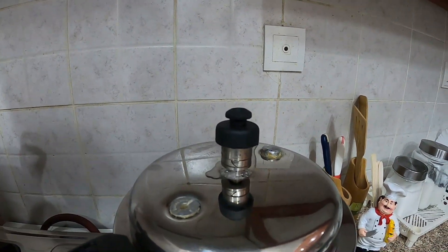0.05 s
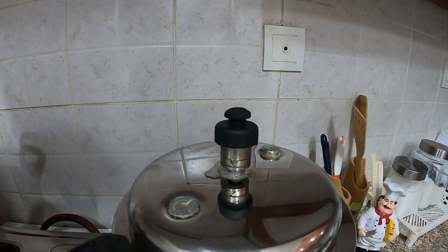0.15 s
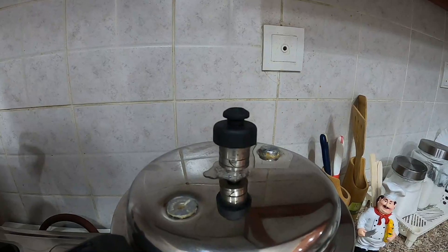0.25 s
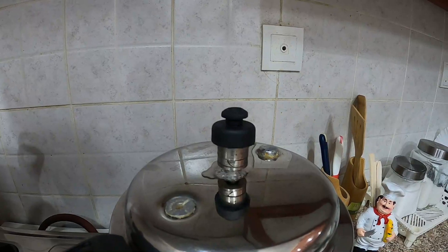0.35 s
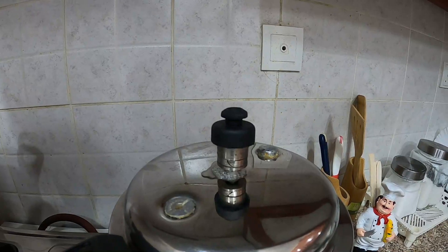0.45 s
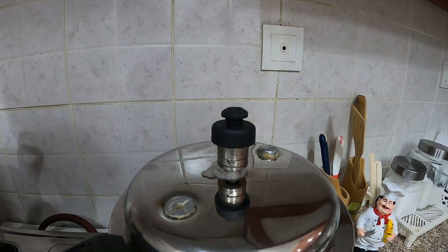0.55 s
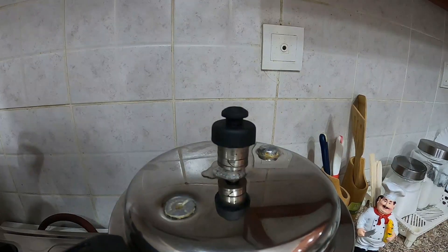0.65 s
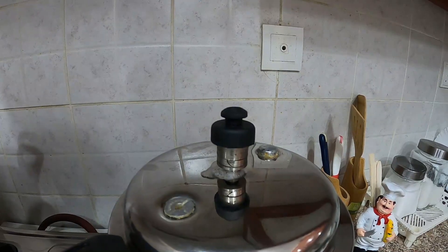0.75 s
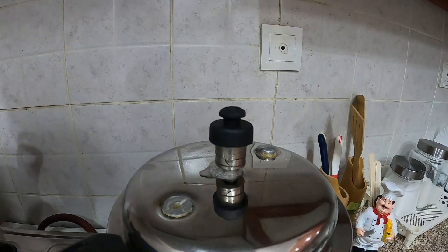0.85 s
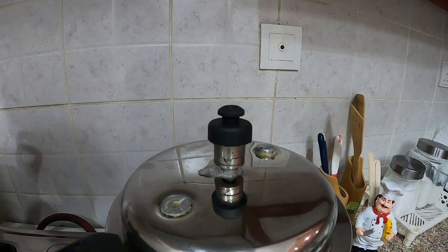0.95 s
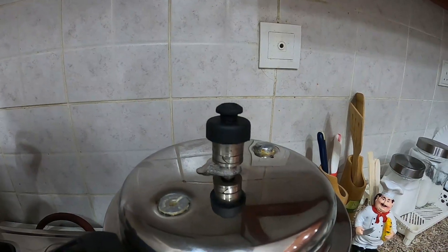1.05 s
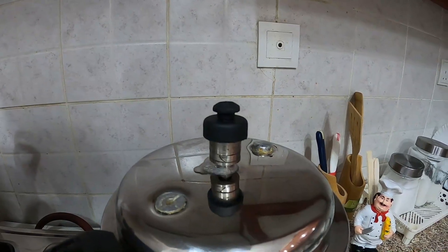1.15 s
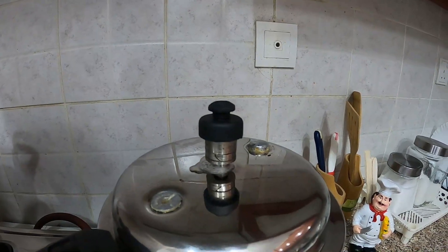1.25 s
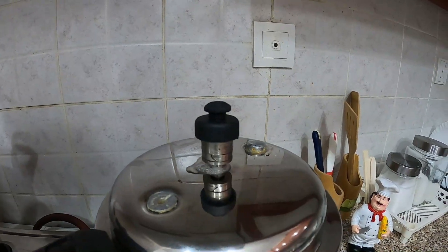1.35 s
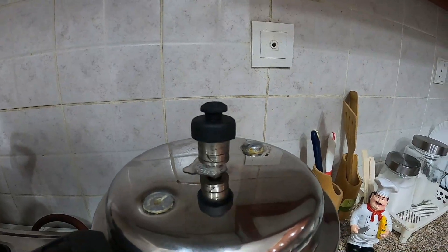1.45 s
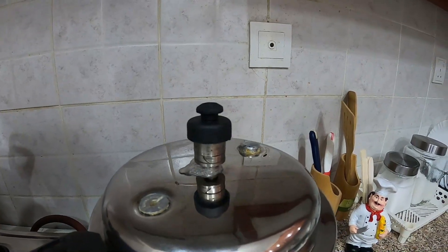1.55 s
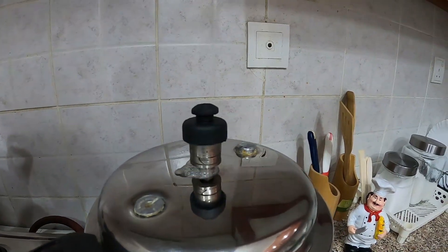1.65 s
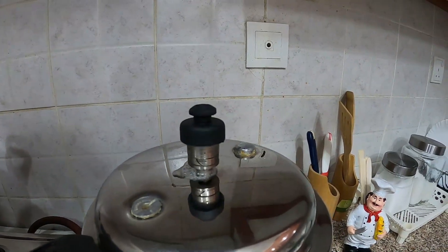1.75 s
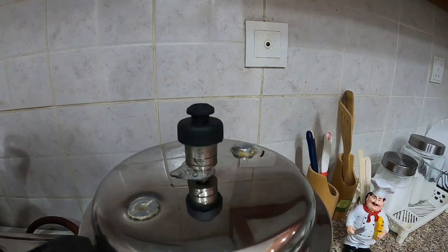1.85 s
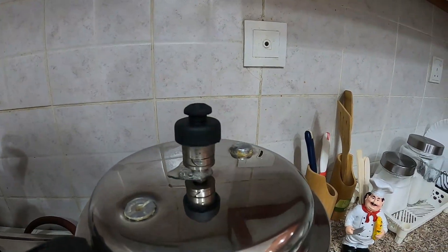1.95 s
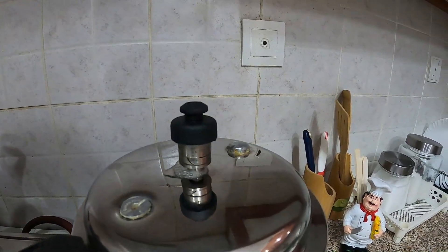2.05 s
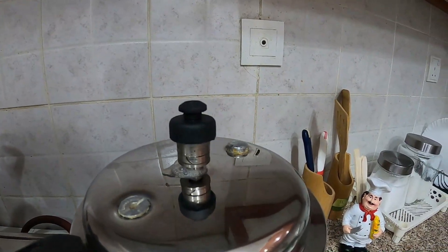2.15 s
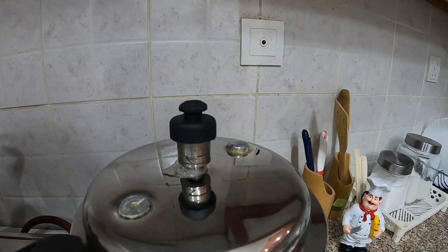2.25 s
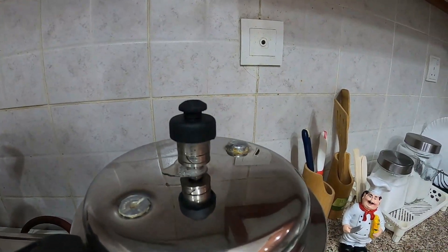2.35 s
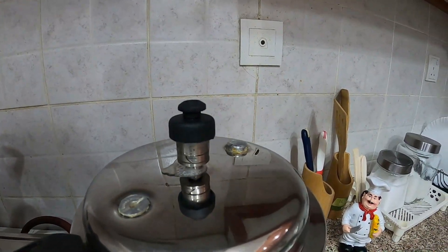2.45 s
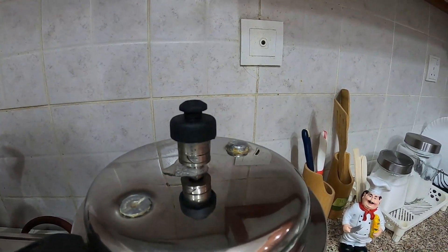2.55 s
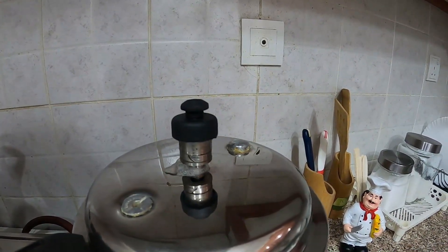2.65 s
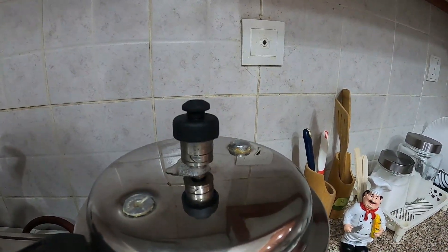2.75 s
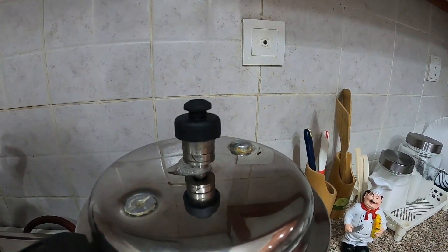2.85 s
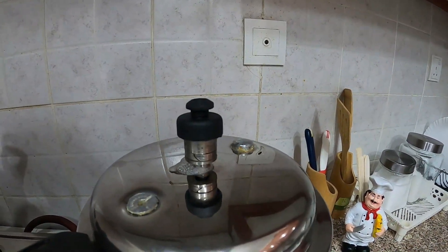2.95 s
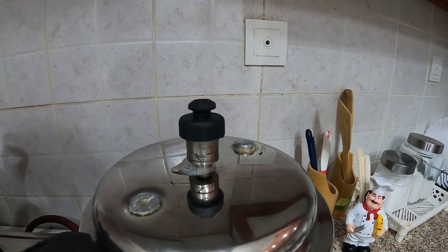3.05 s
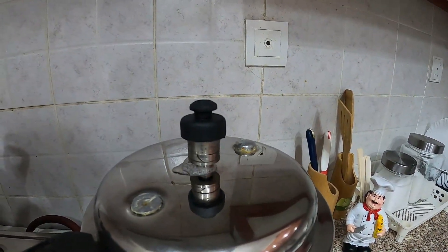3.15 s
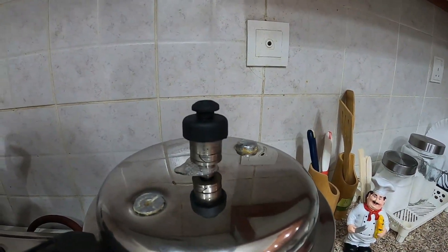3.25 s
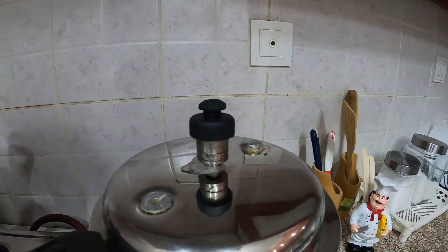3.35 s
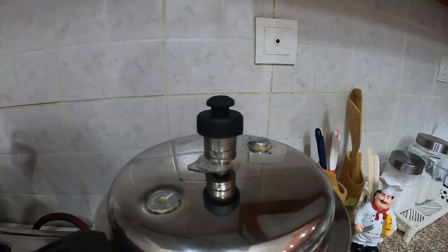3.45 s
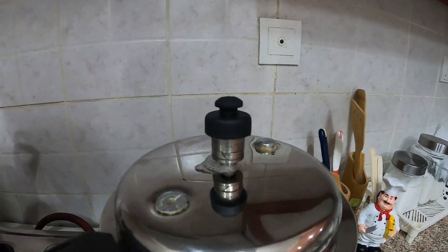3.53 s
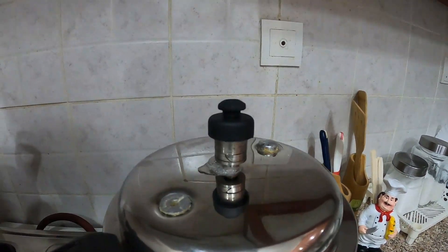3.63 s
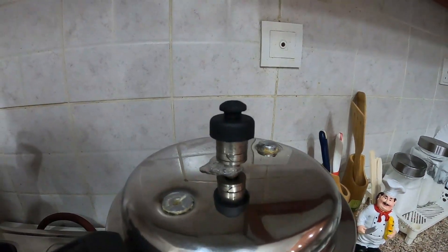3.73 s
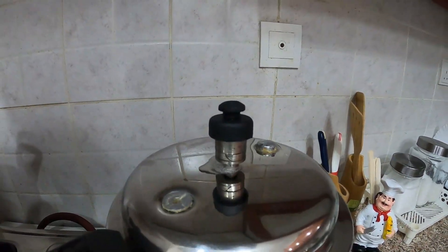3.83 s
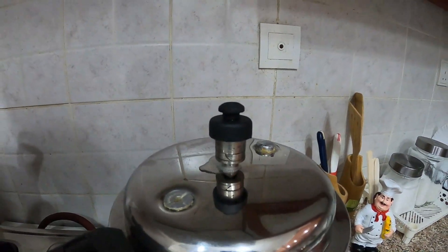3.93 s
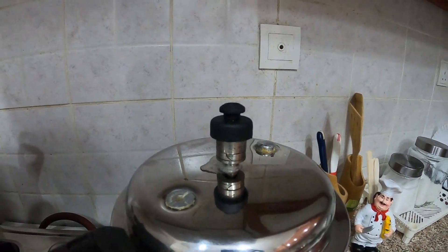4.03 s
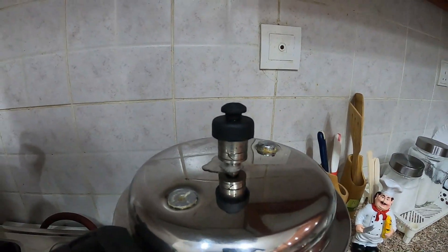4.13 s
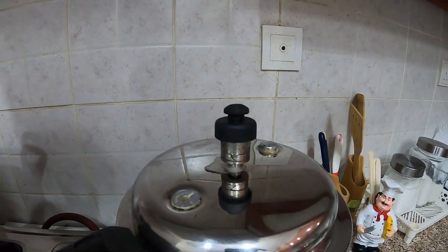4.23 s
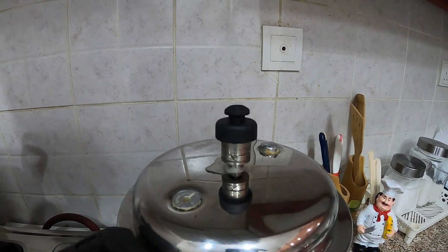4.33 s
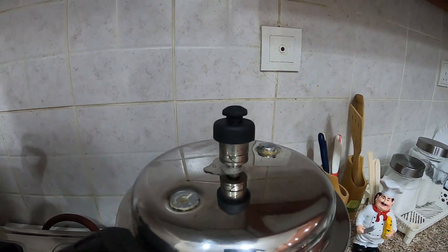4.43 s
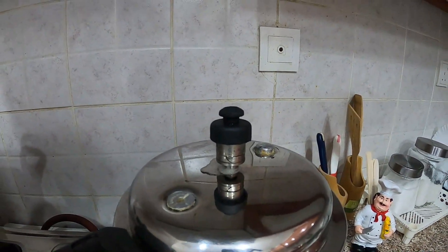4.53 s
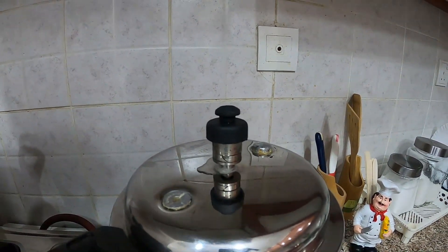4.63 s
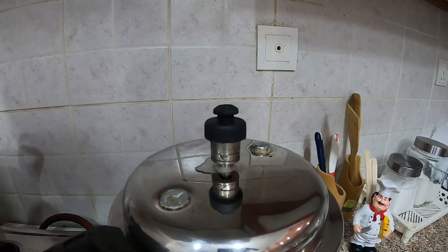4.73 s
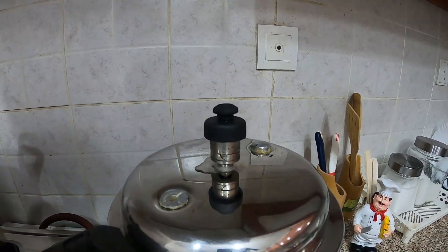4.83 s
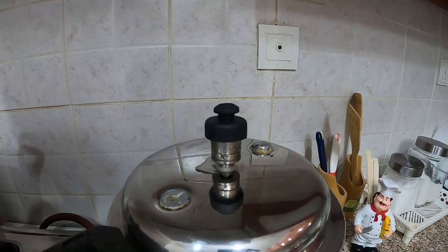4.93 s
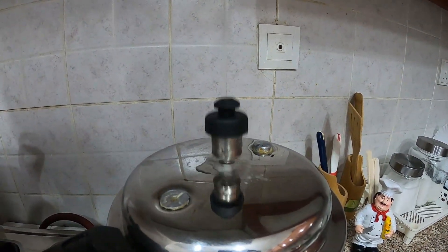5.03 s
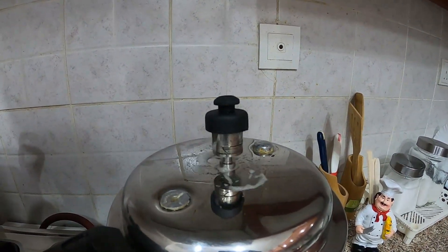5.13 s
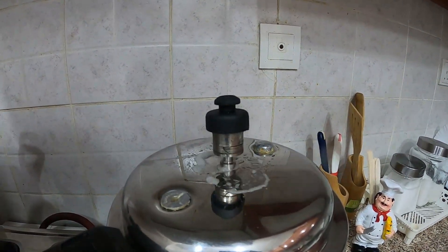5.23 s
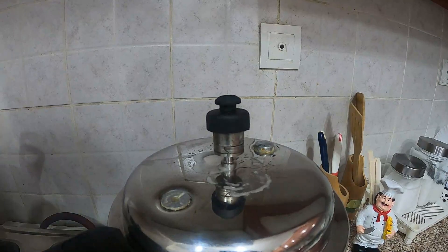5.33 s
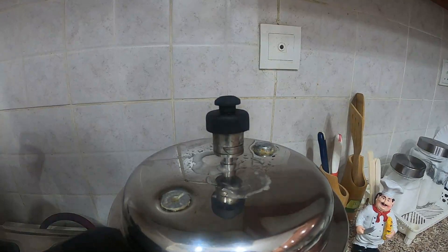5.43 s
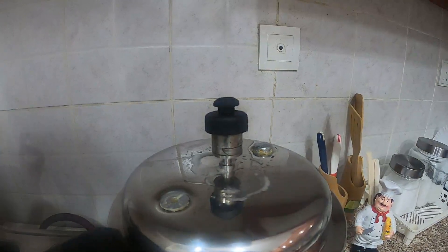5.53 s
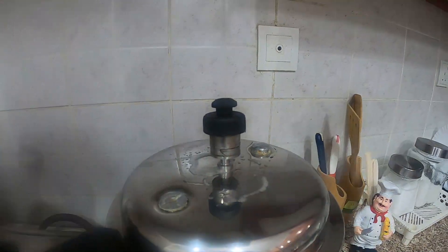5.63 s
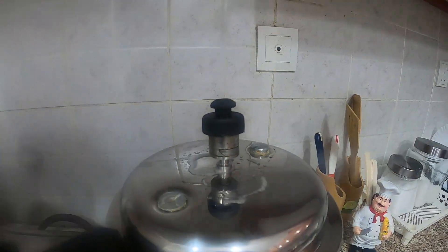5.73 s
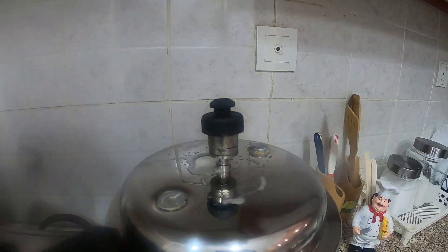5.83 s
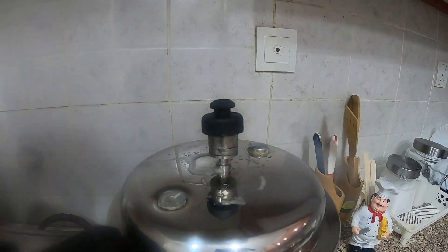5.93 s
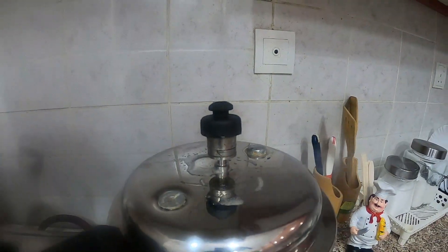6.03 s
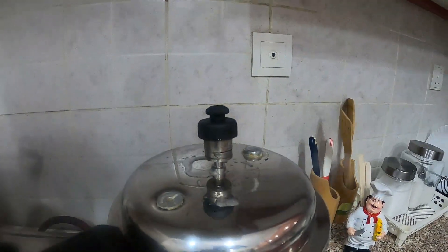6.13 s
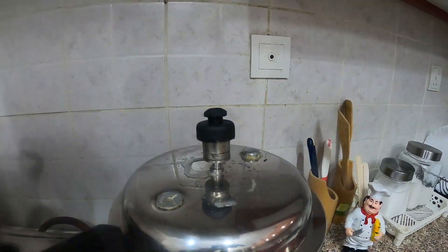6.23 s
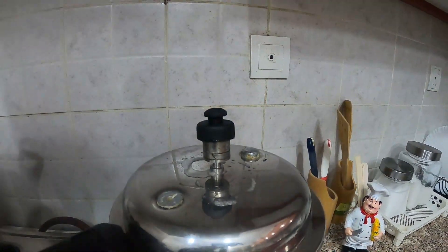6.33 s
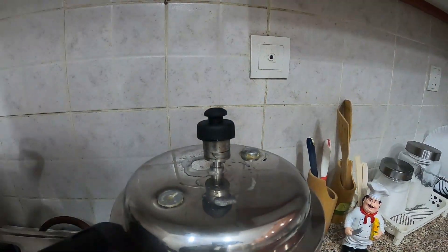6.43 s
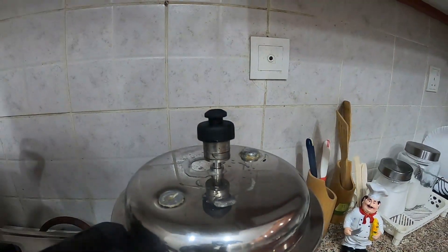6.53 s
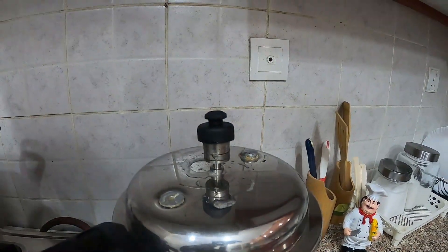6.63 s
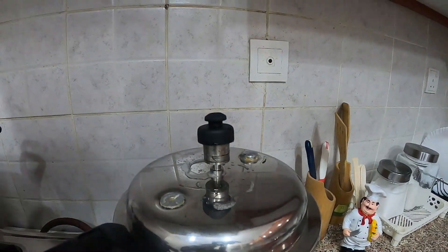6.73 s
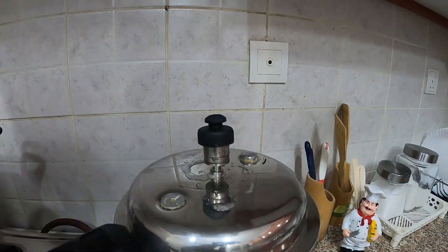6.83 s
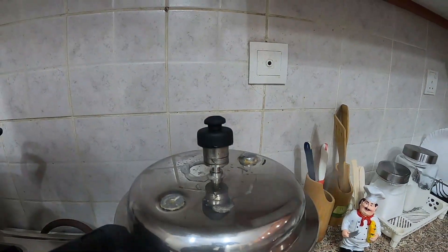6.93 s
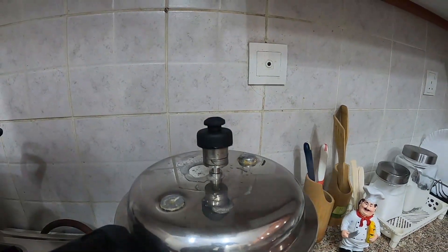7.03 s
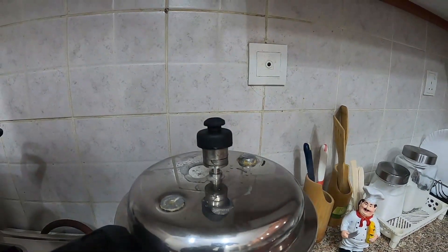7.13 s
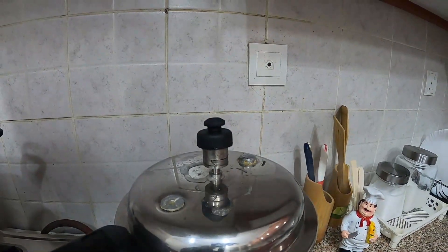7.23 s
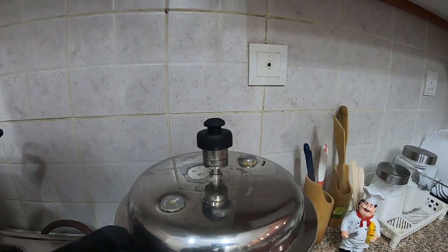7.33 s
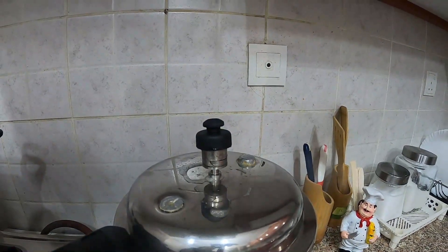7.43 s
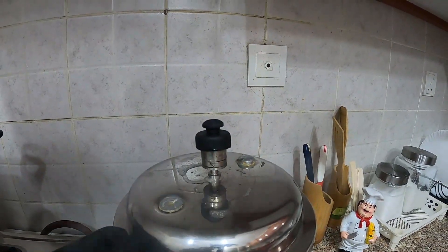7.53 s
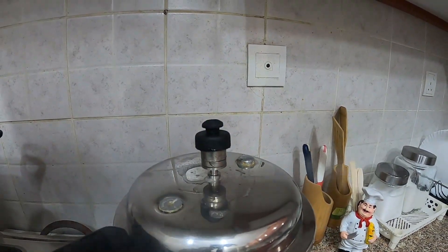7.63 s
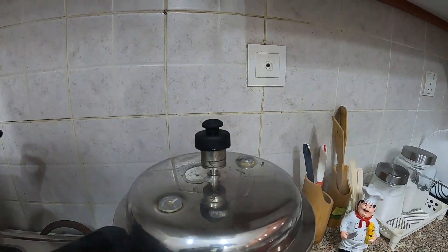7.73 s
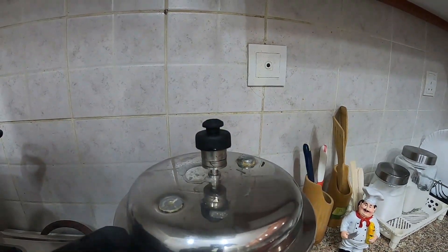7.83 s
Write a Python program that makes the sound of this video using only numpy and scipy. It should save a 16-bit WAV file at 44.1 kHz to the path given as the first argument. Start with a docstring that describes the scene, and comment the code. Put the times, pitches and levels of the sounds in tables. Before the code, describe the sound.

Faint fridge hum and fizzing simmer come first, with isolated ticking spits from a metal valve and a few dull pot knocks. Around three seconds the leaking steam becomes audible, wet and uneven, swelling in short surges. Just past five seconds it breaks open with a throaty splash and low wind thump, then settles into a strong continuous steam jet with thin whistling edges. Close stereo microphone, short hard tile reflections.

```python
"""A refrigerator hums softly and a pressure cooker simmers in a tiled kitchen, as coloured, droplet-laden noise.
Its valve spits as short ringing puffs, bubbles knock in the pot, and a wet, sputtering leak grows in surges.
The weight lifts: a slug of water gushes, spray follows, and the steam cloud buffets mainly the right port.
A loud, steady free jet remains, as noise through the resonances of the open vent, with a soft draught."""
import sys
import numpy as np
from scipy import signal
from scipy.fft import rfft, irfft
from scipy.io import wavfile

SR = 44100
rng = np.random.default_rng(int(sys.argv[2]) if len(sys.argv) > 2 else 0)


def persist_wave(psi):
    """Save psi, clipped to +-1, as 16-bit WAV."""
    counts = np.round(np.clip(psi, -1, 1) * 32767).astype(np.int16)
    wavfile.write(sys.argv[1], SR, np.atleast_2d(counts).T)


N = 347155
TIME = np.arange(N) / SR
BINS = np.fft.rfftfreq(N, 1 / SR)

# multiples of the compressor shaft speed that sound [order], and their relative levels [level_db]
SHAFT_HZ = 48.44
HUM_ORDERS = [3, 6, 9, 11, 12, 13, 19, 27, 36]
HUM_ORDERS_DB = [-2, -29.5, -19.5, -19.5, -28, -29.5, -34, -29, -17]
# course of the refrigerator hum, common to these orders: time_s, relative level_db
HUM_LEVEL = [(0, -47.5), (3.3, -48), (3.6, -50.5), (4.6, -49.5), (4.85, -46), (4.97, -54), (7.8, -64)]

# relative power spectra of the noise sources: frequency_hz, density_db (per Hz)
SIMMER_SPECTRUM = [(20, -4), (80, -0.5), (190, -5), (330, -17.5), (520, -15.5), (860, -23), (1300, -13),
                   (2000, -14.5), (4800, -18.5), (6300, -12.5), (9000, -22.5), (11000, -36), (14000, -42),
                   (15500, -55.0)]
SPIT_SPECTRUM = [(300, -13), (900, -10), (1800, 0), (4500, -2.5), (6300, 6.5), (7400, 0), (9300, -7),
                 (11300, -24), (15000, -34)]
LEAK_SPECTRUM = [(60, -52), (250, -18.5), (500, -15.5), (800, -13.5), (1200, -6.5), (2500, -2.5),
                 (4500, -5.0), (6200, 0.5), (9300, -7.5), (11300, -26), (14000, -30), (15500, -41.2)]
GUSH_SPECTRUM = [(80, -12), (250, -3), (500, -4), (850, -6.5), (1400, -2), (2400, -2.5), (4500, -11),
                 (10000, -35)]  # the slug of water that leaves first
SPRAY_SPECTRUM = [(200, -27), (700, -22), (1400, -14), (2500, -5), (4200, 0.5), (5700, -0.5), (7300, -3),
                  (9200, -6), (11000, -19), (13000, -20), (15000, -33)]
JET_SPECTRUM = [(200, -32.5), (400, -24), (750, -18.5), (1100, -11.5), (2000, -6.5), (3000, 1),
                (4100, -0.9), (6400, -3), (9000, -7.5), (10300, -15), (11600, -27), (14000, -39),
                (15300, -57)]
BUFFET_SPECTRUM = [(15, -1), (35, 1), (100, -1.5), (240, -8), (400, -20.5), (800, -25.5), (1600, -32.5),
                   (4000, -72)]
DRAUGHT_SPECTRUM = [(15, -3), (60, 2), (150, -4), (250, -10.5), (400, -17.5), (1000, -30)]

# resonances and notches of valve, lid and wall: frequency_hz, width_hz, gain_db
SIMMER_PEAKS = [(660, 110, 0), (890, 57, -9), (1835, 160, 5), (3053, 95, 8.5), (7120, 340, -5)]
LEAK_PEAKS = [(507, 59, 7.5), (1397, 65, -6), (1720, 180, -1.5), (3120, 220, 2), (3780, 130, 4),
              (4160, 170, 3.3), (7278, 510, -5), (8200, 80, 3.5)]
RISING_JET_PEAKS = [(1400, 94, -2), (1701, 200, -0.5), (2280, 720, 2), (3390, 100, 3.5), (4048, 580, 5),
                    (4800, 160, 3.5), (5300, 130, 3.5), (6000, 740, 3.5), (6820, 130, 5), (8100, 200, 4)]
SETTLED_JET_PEAKS = [(524, 50, 4), (870, 50, -1.5), (960, 100, -1.5), (1430, 95, -6.5), (1905, 41, 3.5),
                     (2570, 50, -4), (3420, 93, 5), (3930, 57, 1), (4113, 140, 3.5), (4340, 92, 5.1),
                     (5500, 220, 3), (6020, 320, 3), (8549, 200, 0)]
# thin whistling resonances of the fully open vent: frequency_hz, width_hz, gain_db
WHISTLES = [(1276, 45, 3.5), (2760, 60, 1), (3420, 50, -1), (4840, 85, 2.5), (5650, 55, 0), (5980, 80, 0),
            (6240, 55, 4), (7800, 99, 3.5), (8870, 130, -0.5)]

# dull knocks of water boiling in the pot: start_s, relative level_db
KNOCKS = [(1.634, -44), (3.074, -42), (3.309, -49), (3.563, -46), (3.739, -36), (3.754, -37.5),
          (4.934, -37)]
# low modes of the pot: nominal pitch_hz, relative level_db, decay t60_s
POT_MODES = [(330, -2.5, 0.078), (424, -3, 0.12), (525, 0.5, 0.084), (640, -1, .06), (780, -1, .06)]
# spits of water at the valve: start_s, relative level_db, ring pitch_hz
SPITS = [(0.2269, -32.5, 5950), (0.25, -35, 6430), (0.5596, -28, 4090), (0.5675, -31, 6280),
         (0.841, -30, 6170), (1.145, -25.5, 3970), (1.4495, -23.5, 6720), (1.467, -32, 6260),
         (1.4864, -32.5, 6280), (1.658, -33, 6300), (1.8228, -24, 5970), (2.076, -31, 6100),
         (2.342, -30, 6190), (2.628, -27.5, 6090), (2.643, -30, 3080), (3.065, -24, 2780),
         (3.25, -29, 2900), (3.3072, -17, 3700), (3.3118, -15, 5900), (3.915, -18, 6140),
         (3.989, -22, 5760)]

# pressure drives steam past the seated weight: time_s, flow level_db
PRESSURE = [(0, -82), (2.0, -56), (2.6, -46.5), (3.2, -41), (3.85, -37.5), (4.4, -33), (4.65, -34),
            (4.87, -31.5), (5.1, -26.5)]
# the weight tips and lets out a surge: start_s (middle of the opening), length_s, gain_db
SURGES = [(2.863, 0.038, 3), (3.3, 0.09, 3), (3.906, 0.233, 4), (4.247, 0.075, 5)]
# water plugs the gap for a moment: centre_s, half_length_s, dip gain_db (negative)
CHOKES = [(2.84, 0.025, -5), (3.28, 0.013, -3.5), (3.517, 0.028, -2), (4.173, 0.023, -6),
          (4.525, 0.029, -5.5), (4.714, 0.013, -2.5), (4.896, 0.012, -2)]
# eddies in the steam cloud: centre_s, gain_db
EDDIES = [(5.52, 2.5), (6.17, 0), (6.3, 8.5)]

# the two microphone ports: frequency_hz, likeness (1 is identical)
PORT_LIKENESS = [(50, 1), (300, 0.68), (1200, 0.79), (4000, 1), (7000, 0.62), (9500, 0.98), (10700, .4),
                 (11700, .15), (16000, .1)]
# their level difference, left over right: frequency_hz, difference_db
PORT_TILT = [(100, 0), (3200, 1), (5500, -0.5), (6900, 1.5), (7700, -6), (8800, 0), (9900, 1.5),
             (11500, -3), (15000, -1.5)]
# their phase difference, by which the left leads: frequency_hz, lead_rad
PORT_LEAD = [(100, 0.38), (1000, 0.075), (2700, -0.67), (5300, -0.82), (6400, -1.26), (7150, -1.95),
             (8200, -0.53), (9300, -1.33), (11000, -1.5)]

# middle and length of the weight's lift, and the flow level of the open vent
LIFT_S, OPENING_S, OPEN_DB = 5.12, 0.062, -20.5
# middle and length of the change from leak to free jet
FREE_S, FREEING_S = 5.29, .24
# centre, rise and fall of the spray of water that stood in the vent
SPRAY_S, SPRAY_RISE_S, SPRAY_FALL_S = 5.24, .1, .11
# the flow overshoots as the vent clears, then sags
OVERSHOOT_DB, SAG_DB, SAG_S, SAG_LENGTH_S = 0.9, -1.6, 5.42, .12
SURGE_EDGE_S = 0.038  # time a surge takes to open, and to close
SETTLE_S = 6.15  # the weight settles at the top: middle of the change of resonances
# the cloud of steam reaches the microphone, then thins out
GUST_S, GUST_DB, GUST_RISE_DB_PER_S, GUST_FALL_DB_PER_S = 5.245, -19.5, 305, 25
# the stereo image narrows: middle and length of the change, and change of side level
NARROW_S, NARROWING_S, NARROW_DB = 5.635, 0.83, -19
EDGE_HZ = 15250  # upper band edge


def gain_of(db):
    """Level definition: decibels to amplitude."""
    return 10 ** (np.asarray(db) / 20)


def evened(x):
    """Normalisation by mean power: scales to rms 1."""
    return x / np.sqrt(np.mean(abs(x) ** 2) + 1e-20)


def lowpass(x, hz):
    """Zero-phase filtering: a smooth low-pass without delay."""
    return irfft(rfft(x) / (1 + (BINS / hz) ** 4), N)


def wander(rate_hz):
    """Band-limited random modulation of rms 1, up to about the given rate."""
    return evened(lowpass(rng.standard_normal(N), rate_hz))


def curve(rows, axis=1):
    """Linear interpolation of one column of a time table, at every sample."""
    rows = np.array(rows)
    return np.interp(TIME, rows[:, 0], rows[:, axis])


def ramp(middle_s, length_s):
    """Half-sine transition from 0 to 1."""
    return .5 + .5 * np.sin(np.pi * np.clip((TIME - middle_s) / length_s, -.5, .5))


def bell(s, before_s, after_s):
    """Gaussian swell to 1 and back, with separate rise and fall."""
    return np.exp(-((TIME - s) / np.where(TIME < s, before_s, after_s)) ** 2)


def burst(s, hold_s, rise_db_per_s, fall_db_per_s):
    """Exponential attack, hold and exponential release, as a gain of at most 1."""
    attack_db = np.minimum(TIME - s, 0) * rise_db_per_s
    release_db = np.maximum(TIME - s - hold_s, 0) * fall_db_per_s
    return gain_of(attack_db - release_db)


def read(points):
    """Interpolation on a log frequency axis: a table at every bin."""
    hz, value = np.transpose(points)
    return np.interp(np.log(BINS + 1), np.log(hz + 1), value)


def colour(spectrum, peaks=()):
    """Resonant shaping: gain of a broad spectrum with bell-shaped peaks and notches on it."""
    peaks_db = sum(db * np.exp(-2 * ((BINS - hz) / width) ** 2) for hz, width, db in peaks)
    return gain_of(read(spectrum) + peaks_db)


def turbulence(drops_per_s, drop_share, spread_db):
    """Random impulses in noise: droplets burst as clicks of uneven size; total rms is about 1."""
    size = gain_of(spread_db * np.minimum(rng.exponential(1, N), 3))
    falls = rng.random(N) < drops_per_s / SR
    drops = evened(rng.choice([-1, 1], (2, N)) * size * falls)
    share = np.clip(drop_share, 0, 1)
    return np.sqrt(1 - share) * rng.standard_normal((2, N)) + np.sqrt(share) * drops


def tiles(wall_s=.0019, wall=0.064, scatter=0.23, t60=0.094):
    """Room reflection: response of the direct path, one close reflection, and short scatter off the tiles."""
    taps = rng.standard_normal(N) * (rng.random(N) < 2000 / SR) * (TIME > .004)
    taps = taps * gain_of(-60 * TIME / t60)
    reflection = wall * np.exp(-2j * np.pi * BINS * wall_s)
    return 1 + reflection + scatter * rfft(taps) / np.linalg.norm(taps)


def ports(drive, gain):
    """Partial coherence: colours two unrelated drives and mixes them as the two ports hear the cooker."""
    a, b = rfft(drive)
    same, tilt = np.clip(read(PORT_LIKENESS), -1, 1), gain_of(read(PORT_TILT) / 2)
    shared = same * np.exp(-1j * read(PORT_LEAD)) / tilt
    own = np.sqrt(1 - same ** 2) / tilt
    # white drive of rms 1 gives a mean of both ports of rms 1
    centre = np.sqrt(abs(tilt + shared) ** 2 + own ** 2) / 2
    return irfft(np.array([tilt * a, shared * a + own * b]) * evened(gain) / centre, N)


def hum(waver=.001, throb_db=1.0, drone_db=-50, drone_s=1.42, drone_hold_s=.75,
        drone_rise_db_per_s=90, drone_fall_db_per_s=45):
    """Harmonic series of a slightly wavering compressor shaft; its first order swells and fades as a drone."""
    turns = np.cumsum(SHAFT_HZ * (1 + waver * wander(3.2))) / SR
    lines = sum(gain_of(db) * np.sin(2 * np.pi * order * turns)
                for order, db in zip(HUM_ORDERS, HUM_ORDERS_DB))
    swell = burst(drone_s, drone_hold_s, drone_rise_db_per_s, drone_fall_db_per_s)
    drone = gain_of(drone_db) * swell * np.sin(2 * np.pi * turns)
    throb = gain_of(curve(HUM_LEVEL) + throb_db * wander(6.2))
    return np.sqrt(2) * (throb * lines + drone)  # sine levels are rms


def simmer(level_db=-47.0, flicker_db=.5, rumble_edge_hz=30):
    """Broadband noise with impulses: burner rumble and the fine fizz of the boiling pot."""
    fizz = turbulence(drops_per_s=500, drop_share=0.063, spread_db=6)
    highpass = BINS / np.hypot(BINS, rumble_edge_hz)
    gain = colour(SIMMER_SPECTRUM, SIMMER_PEAKS) * highpass * tiles()
    return gain_of(level_db + flicker_db * wander(21)) * ports(fizz, gain)


def knocks(level_db=-9):
    """Impulsive modal excitation: large bubbles collapse and ring the low modes of the pot."""
    t = np.arange(SR // 4) / SR
    out = np.zeros(N + len(t))
    for s, knock_db in KNOCKS:
        # every mode is slightly detuned at each knock
        ring = sum(gain_of(db - 60 * t / t60) * np.sin(2 * np.pi * hz * rng.uniform(0.933, 1.04) * t)
                   for hz, db, t60 in POT_MODES)
        out[round(s * SR):][:len(t)] += gain_of(knock_db + level_db) * ring
    return out[:N]


def wind(left_db=-10.5, right_db=5.0, lump_db=1.7, draught_db=-43.5, hold_s=0.025, eddy_s=.03):
    """Turbulent pressure on the ports: a cloud buffets mainly the right; the jet keeps up a lumpy draught."""
    def lumpy(shape):
        """Coloured noise under slow random modulation, at rms 1."""
        noise = irfft(rfft(rng.standard_normal(N)) * colour(shape), N)
        return evened(noise * gain_of(lump_db * wander(18)))

    left, right, draught = lumpy(BUFFET_SPECTRUM), lumpy(BUFFET_SPECTRUM), lumpy(DRAUGHT_SPECTRUM)
    cloud = burst(GUST_S, hold_s, GUST_RISE_DB_PER_S, GUST_FALL_DB_PER_S) * (1 - ramp(6.37, 0.22))
    eddies_db = sum(db * bell(s, eddy_s, eddy_s) for s, db in EDDIES)
    buffets = np.array([gain_of(left_db) * left, gain_of(right_db) * right])
    gust = gain_of(GUST_DB + eddies_db) * cloud * buffets
    return gust + gain_of(draught_db) * ramp(FREE_S, FREEING_S) * draught


def spits(level_db=-9.0, tail_db=-15.5, tail_s=0.033, attack_s=0.0012, length_s=.0038,
          ring_db=-8.0, ring_s=0.0024):
    """Transient excitation: ragged puffs of milliseconds ring the valve and are thrown back by the tiles."""
    envelope, rings = np.zeros(N), np.zeros(N)
    for s, spit_db, hz in SPITS:
        span = (TIME >= s) & (TIME < s + .25)
        t = TIME[span] - s
        rise = gain_of(spit_db) * np.minimum(t / attack_s, 1)
        puff, tail = np.exp(-(t / length_s) ** 2), gain_of(tail_db) * np.exp(-t / tail_s)
        envelope[span] += rise * (puff + tail)
        rings[span] += rise * np.exp(-t / ring_s) * np.sin(2 * np.pi * hz * t)
    drive = turbulence(drops_per_s=2300, drop_share=0.36, spread_db=1.0)
    puffs = ports(drive * envelope, colour(SPIT_SPECTRUM))
    return gain_of(level_db) * puffs + gain_of(ring_db) * rings


def gush(level_db=-26.0, gurgle_db=0.5, start_s=5.183, hold_s=0.049, rise_db_per_s=310, fall_db_per_s=290):
    """Two-phase discharge: the first slug of water leaves the vent with a throaty splash."""
    drive = turbulence(drops_per_s=700, drop_share=0.21, spread_db=0)
    envelope = burst(start_s, hold_s, rise_db_per_s, fall_db_per_s)
    return gain_of(level_db + gurgle_db * wander(60)) * envelope * ports(drive, colour(GUSH_SPECTRUM))


def flow():
    """Pressure-driven flow level in dB: rising pressure with surges and chokes, then the open vent."""
    seated = curve(PRESSURE) + sum(db * bell(s, half, half) for s, half, db in CHOKES)
    seated = seated + sum(db * (ramp(s, SURGE_EDGE_S) - ramp(s + length, SURGE_EDGE_S))
                          for s, length, db in SURGES)
    overshoot = OVERSHOOT_DB * bell(SPRAY_S, SPRAY_RISE_S, SPRAY_FALL_S)
    sag = SAG_DB * bell(SAG_S, SAG_LENGTH_S, SAG_LENGTH_S)
    vent = OPEN_DB + overshoot + sag
    return seated + (vent - seated) * ramp(LIFT_S, OPENING_S)


def leak(level_db=-0.17, sputter_db=1.04, sputter_hz=40, brighten=0.6, treble_hz=6800, even_flow_db=-35,
         bubbling_hz=3000, wet_db=3.0, dry_db=-1.2, drying_at_s=4.02, drying_s=0.53):
    """Throttled two-phase flow: water in the gap sputters and bubbles until blown dry; more flow is brighter."""
    drive = turbulence(drops_per_s=450, drop_share=0.077, spread_db=3.0)
    treble, low = drive - lowpass(drive, treble_hz), lowpass(drive, bubbling_hz)
    bright_db = brighten * np.clip(flow() - even_flow_db, -12, 6)
    bubbling_db = wet_db + (dry_db - wet_db) * ramp(drying_at_s, drying_s)
    drive = drive + treble * (gain_of(bright_db) - 1) + low * (gain_of(bubbling_db) - 1)
    sputter = gain_of(level_db + sputter_db * wander(sputter_hz))
    return ports(drive * sputter, colour(LEAK_SPECTRUM, LEAK_PEAKS) * tiles(scatter=0.24))


def spray(level_db=0):
    """Atomisation: the water standing in the vent is blown out as broad, gritty noise."""
    drive = turbulence(drops_per_s=2200, drop_share=0.16, spread_db=3.0)
    return gain_of(level_db) * ports(drive, colour(SPRAY_SPECTRUM))


def jet(level_db=0, flutter_db=0.5, flutter_hz=25):
    """Jet noise with resonance: the vent rings, and its resonances and reflections shift as the weight settles."""
    settled = np.clip((TIME - SETTLE_S) / 0.6 + .5, 0, 1)
    rising_vent = colour(JET_SPECTRUM, RISING_JET_PEAKS) * tiles()
    rising = ports(rng.standard_normal((2, N)), rising_vent)
    open_vent = colour(JET_SPECTRUM, [*SETTLED_JET_PEAKS, *WHISTLES])
    open_vent = open_vent * tiles(wall_s=.0017, wall=0.045, scatter=0.21)
    steady = ports(rng.standard_normal((2, N)), open_vent)
    blend = np.sqrt(1 - settled) * rising + np.sqrt(settled) * steady
    return gain_of(level_db + flutter_db * wander(flutter_hz)) * blend


def valve():
    """Power sharing of one steam flow between leak, spray and jet, timed to the lift of the weight."""
    free, wet = ramp(FREE_S, FREEING_S), bell(SPRAY_S, SPRAY_RISE_S, SPRAY_FALL_S)
    steam = np.sqrt(1 - free) * leak() + np.sqrt(free) * jet()
    return gain_of(flow()) * (np.sqrt(1 - wet) * steam + np.sqrt(wet) * spray())


def scene(side_db=1.0):
    """Superposition: the cooker, its image narrowing after the lift, with wind and hum."""
    left, right = simmer() + knocks() + spits() + gush() + valve()
    width = gain_of(side_db + NARROW_DB * ramp(NARROW_S, NARROWING_S))
    mid, side = (left + right) / 2, width * (left - right) / 2
    return np.array([mid + side, mid - side]) + wind() + hum()


def record(dry):
    """Band limitation: a steep linear-phase low-pass."""
    band = signal.firwin(401, EDGE_HZ, window=("kaiser", 9), fs=SR)
    return signal.oaconvolve(dry, band[None], "same", axes=1)


dry = scene()
out = record(dry)
persist_wave(out)
```